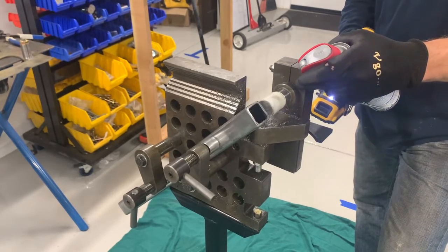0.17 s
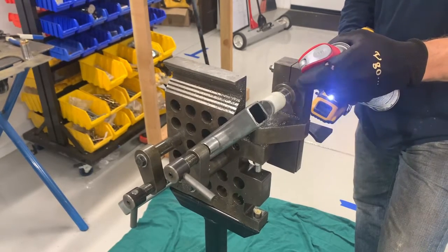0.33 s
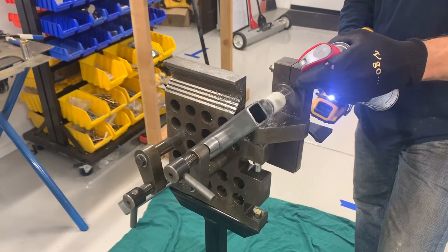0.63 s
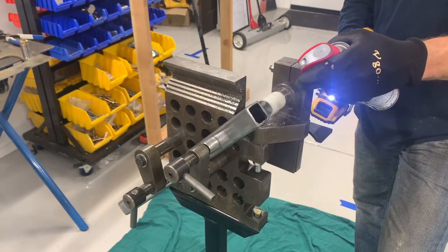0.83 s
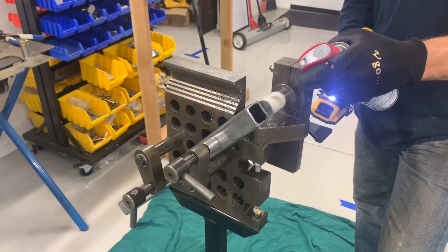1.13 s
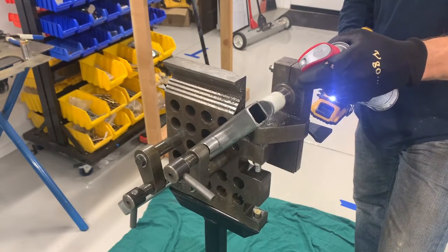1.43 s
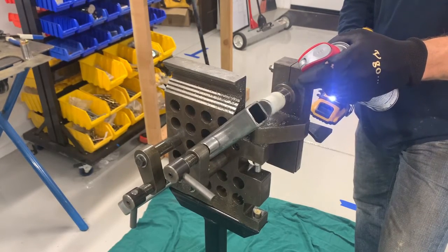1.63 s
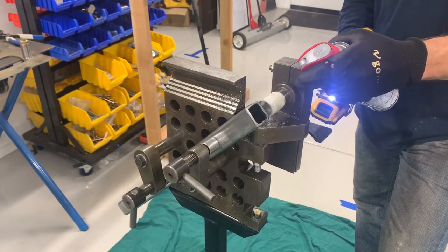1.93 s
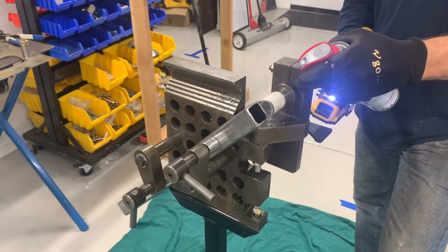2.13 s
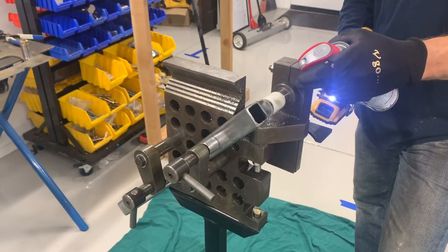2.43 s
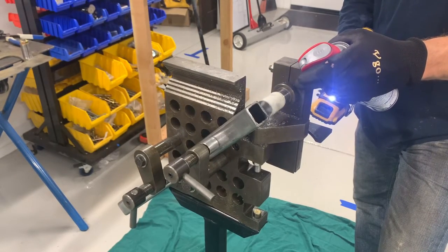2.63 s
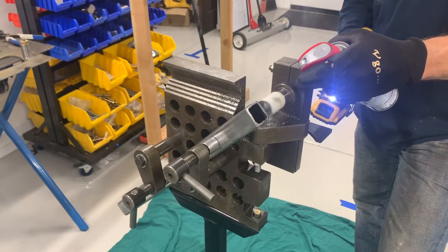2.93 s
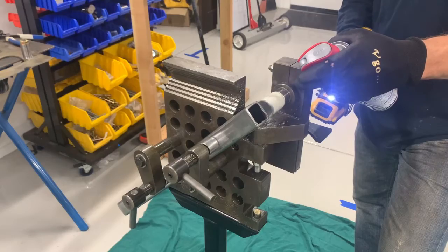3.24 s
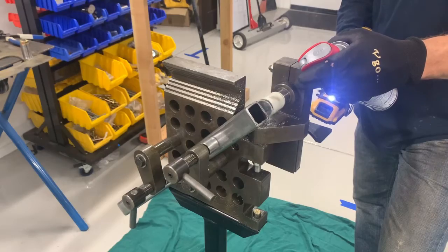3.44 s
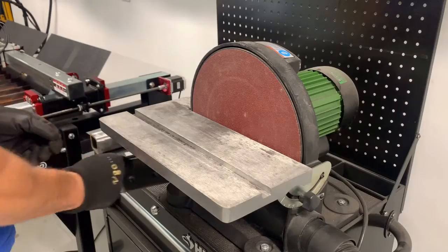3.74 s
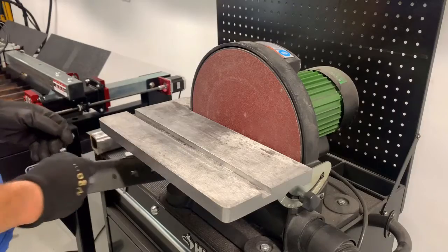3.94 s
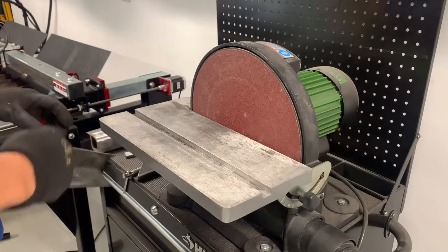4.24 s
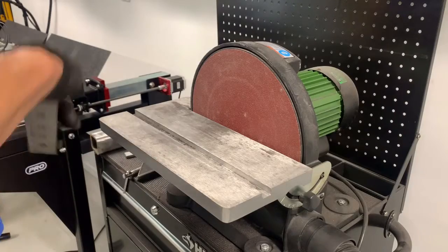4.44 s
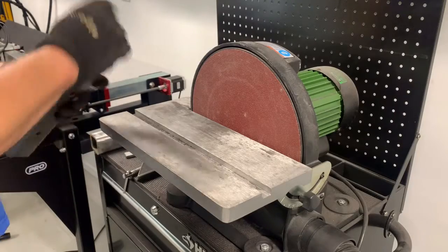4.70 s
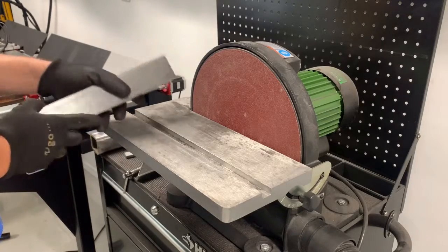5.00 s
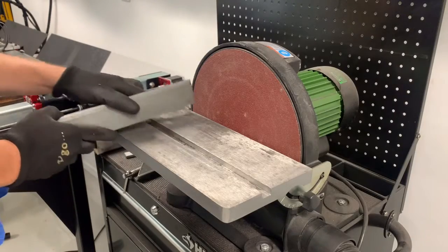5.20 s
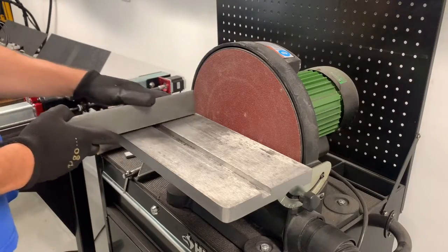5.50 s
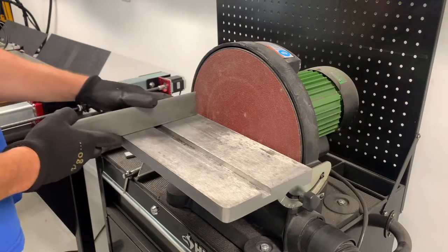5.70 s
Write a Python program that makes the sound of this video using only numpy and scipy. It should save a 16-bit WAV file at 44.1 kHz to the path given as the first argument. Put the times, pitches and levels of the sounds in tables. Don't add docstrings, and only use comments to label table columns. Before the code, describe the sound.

Pulsing metal grinding with a thin motor whine cuts abruptly to quiet rustling, then a loud clank of steel on a cast table and smaller bounces.

```python
import sys
import numpy as np
from scipy import signal
from scipy.fft import rfft, irfft, next_fast_len
from scipy.io import wavfile
from scipy.ndimage import map_coordinates

SR = 44100
rng = np.random.default_rng(int(sys.argv[2]) if len(sys.argv) > 2 else 0)


def to_wav(sig):
    pcm = np.clip(np.atleast_2d(sig), -1, 1) * 32767
    pcm = np.round(pcm).astype(np.int16)
    wavfile.write(sys.argv[1], SR, pcm.T)


def voltage_ratio(decibels):
    exponent = np.asarray(decibels, float) / 20
    return 10 ** exponent


N = 258426
SIZE = next_fast_len(N)
TIME = np.arange(N) / SR
HZ = np.maximum(np.fft.rfftfreq(SIZE, 1 / SR), 1)
SPLICE_S, BAR_DOWN_S = 3.4855, 5.263
FLAT = [(20, 0), (20000, 0)]
PORT_LAG_S, LAG_FROM_HZ = 0.000213, 4300
PORT_PHASE = -2 * np.pi * PORT_LAG_S * np.maximum(HZ - LAG_FROM_HZ, 0)

# frequency in Hz, shared power 0-1.
SAW_ALIKE = [(60, 0.1), (200, 0.95), (700, 0.38), (2500, 0.38), (4400, 0.12), (9000, 0.52), (15000, 1)]
# frequency in Hz, shared power (below 0 counts as 0).
BENCH_ALIKE = [(60, 0.92), (180, 0.96), (550, 0.39), (1650, 0.19), (4970, -0.43), (15000, -0.63)]


def rms_one(x):
    return x / np.sqrt(np.mean(x ** 2) + 1e-20)


def in_time(rows):
    s, *columns = np.transpose(rows)
    return [np.interp(TIME, s, c) for c in columns]


def at_hz(points, hz):
    where_hz, value = np.transpose(points)
    return np.interp(np.log(hz), np.log(np.maximum(where_hz, 1)), value)


def drift(rate_hz):
    r = np.exp(-80 * np.pi * rate_hz / SR)
    white = rng.standard_normal(N // 40 + 2002)
    slow = signal.lfilter([1], [1, -2 * r, r * r], white)[2000:]
    return np.interp(np.arange(N) / 40, np.arange(len(slow)), rms_one(slow))


def sound(pair):
    return irfft(pair, SIZE)[:, :N]


def stereo_noise(spectrum_db, alike, phase=0):
    shared, left, right = rfft(rng.standard_normal((3, SIZE)))
    share = np.clip(at_hz(alike, HZ), 0, 1)
    shift = np.exp(0.5j * np.outer([1, -1], phase + 0 * HZ))
    pair = np.sqrt(share) * shared * shift + np.sqrt(1 - share) * np.array([left, right])
    pair = pair * voltage_ratio(at_hz(spectrum_db, HZ))
    return pair * SIZE / np.sqrt(np.sum(np.abs(pair) ** 2))


def in_bands(pair, gain_db, count):
    low_hz, high_hz = 40, 16000
    place = np.log(HZ / low_hz) / np.log(high_hz / low_hz) * (count - 1)
    place = np.clip(place, 0, count - 1)
    out = 0
    for k, hz in enumerate(np.geomspace(low_hz, high_hz, count)):
        band = sound(pair * np.clip(1 - np.abs(place - k), 0, 1))
        out = out + voltage_ratio(gain_db(hz)) * band
    return out


def ring(push, hz, t60_s):
    r, w = voltage_ratio(-60 / (t60_s * SR)), 2 * np.pi * hz / SR
    return signal.lfilter([0, np.sin(w)], [1, -2 * r * np.cos(w), r * r], push + 1e-18)


def bites():
    # start in seconds, first swell in dB, second swell in dB.
    turns = [(0.115, 1.5, -0.3), (0.272, 3.5, 0.5), (0.418, 4, 0), (0.562, 3.5, 2.4), (0.698, 3.5, 1.5),
             (0.835, 4, 1.5), (0.963, 4, 1), (1.102, 2.5, 1.5), (1.242, 3.5, 1), (1.379, 2.5, 0),
             (1.521, 4, 3), (1.667, 4.5, 3), (1.804, 4.5, 0.5), (1.946, 6.5, 1.5), (2.083, 4.5, 1),
             (2.22, 4.5, 2.5), (2.36, 3.5, 3.5), (2.5, 4.5, 5), (2.64, 8.5, 5), (2.784, 4, 3),
             (2.917, 7.5, 4), (3.057, 7, 2.5), (3.205, 5.5, 4), (3.334, 5, -0.2), (3.473, 3.5, 1.5)]
    far_wall_lag_s = 0.08
    s, first_db, second_db = np.transpose(turns)
    return np.concatenate([s, s + far_wall_lag_s]), np.concatenate([first_db, second_db])


def swells(heights_db, length_s):
    marks = np.zeros(N)
    marks[(bites()[0] * SR).astype(int)] = heights_db
    return signal.oaconvolve(marks, np.hanning(int(length_s * SR)), "same")


def chip_hiss(low_db):
    # frequency in Hz, density in dB per Hz.
    chips = [(150, -42), (260, -20), (354, -9.5), (1010, -7.5), (1600, -1), (2180, -1), (2460, 1),
             (3350, -4.5), (4880, -2.5), (7240, -11), (9520, -7), (11500, -4.5), (13700, -17), (15700, -13)]
    high_db = swells(0.67 * bites()[1], length_s=0.1)
    teeth_hz = 115 * (1 + 0.044 * drift(3.7))
    teeth_db = 0.33 * np.sin(2 * np.pi * np.cumsum(teeth_hz) / SR) + 0.87 * drift(73)

    def chatter_db(hz):
        bright = np.clip(np.log2(hz / 2500), 0, 1)
        grip = np.clip(np.log2(hz / 150), 0, 1)
        swell_db = (1 - bright) * low_db + bright * high_db
        return grip * (swell_db + teeth_db) + 0.89 * drift(34)

    return voltage_ratio(-0.5) * in_bands(stereo_noise(chips, SAW_ALIKE, PORT_PHASE), chatter_db, count=20)


def tube_ring(low_db):
    # frequency in Hz, bandwidth in Hz, level in dB.
    tube = [(107, 5.9, -49), (160, 10, -55), (211, 6, -29), (2490, 58, -8), (4800, 29, -21.5),
            (368.2, 4.7, -18), (494.7, 7, -15.5), (644, 11, -27), (777, 7.8, -19), (1227, 13, -14),
            (1416, 13, -6), (1837, 21, -12.5), (3000, 40, -30), (3910, 45, -8.5), (1638, 25, -13.5),
            (1643, 21, -6.5), (2050, 40, -18), (2033, 12, -4), (2310, 19, -27.5), (2537, 17, -15.5),
            (2780, 40, -19.5), (3750, 50, -6), (4120, 62, -6), (4340, 33, -1), (4650, 13, -4),
            (9800, 200, -41), (9570, 390, 1)]
    white = sound(stereo_noise(FLAT, SAW_ALIKE, PORT_PHASE))
    out = np.zeros((2, N))
    for hz, width_hz, level_db in tube:
        chance = rng.standard_normal(len(bites()[0]))
        push = white * voltage_ratio(1.2 * low_db + swells(3.8 * chance, length_s=0.08))
        t60_s = np.log(1000) / (np.pi * width_hz)
        out += voltage_ratio(level_db - 15.5) * rms_one(ring(push, hz, t60_s))
    return out


def gear_whine(low_db):
    # time in seconds, frequency in Hz.
    gear_hz = [(0, 2497), (.8, 2508), (1.35, 2525), (1.7, 2500), (2, 2487), (2.8, 2475), (2.92, 2435),
               (3.2, 2420), (3.48, 2435)]
    (mesh_hz,) = in_time(gear_hz)
    mesh_hz = mesh_hz * (1 + 0.004 * drift(25) + 0.005 * drift(5))
    phase = 2 * np.pi * np.cumsum(mesh_hz) / SR
    tone = voltage_ratio(4.5 * drift(22) + 2 * drift(3)) * np.sin(phase + [[-0.2], [0.2]])
    octave = voltage_ratio(-2 - TIME + 4 * drift(20)) * np.sin(2 * phase + [[-0.5], [0.5]])
    return np.sqrt(2) * voltage_ratio(0.48 * low_db) * (tone + octave)


def drill_hum():
    # frequency in Hz, density in dB per Hz.
    hum = [(15, -47), (25, -13.5), (54, -6.5), (81, -27.5), (97, -1.5), (130, -12.5), (146, -4.5),
           (204, 14), (260, 10), (340, -32), (570, -120)]
    return voltage_ratio(-70) * sound(stereo_noise(hum, SAW_ALIKE))


def saw():
    # time in seconds, chip hiss in dB, gear whine in dB.
    cut = [(0.0, -35, -63), (0.59, -36, -52), (1.38, -37.5, -54.5), (2.25, -36, -51), (2.68, -38.5, -49.5),
           (3.32, -37, -53), (3.34, -36.5, -49.5)]
    hiss_db, whine_db = in_time(cut)
    low_db = swells(bites()[1], length_s=0.07)
    grind = voltage_ratio(hiss_db) * (chip_hiss(low_db) + tube_ring(low_db))
    whine = voltage_ratio(whine_db) * gear_whine(low_db)
    splice_db = np.interp(TIME, SPLICE_S + np.array([-0.001, 0, 0.003, 0.004]), [0, -18, -26, -90])
    return (grind + whine + drill_hum()) * voltage_ratio(splice_db)


def on_landing(before, after):
    return np.interp(TIME, [BAR_DOWN_S, BAR_DOWN_S + 0.04], [before, after])


def room_tone():
    # frequency in Hz, density in dB per Hz.
    air = [(88, -16), (150, -14), (259, -12.5), (308, -12.5), (531, -28.5), (4510, -24.5), (6920, -30),
           (9440, -19.5), (11700, -26), (13400, -25), (15700, -34)]
    return voltage_ratio(-78.5) * sound(stereo_noise(air, BENCH_ALIKE))


def stand_rumble():
    # frequency in Hz, density in dB per Hz.
    rumble = [(12, -32), (20, -8.5), (43, 0.5), (69, 2), (93, -5), (140, -23), (220, -23), (290, -45),
              (480, -120)]
    level_db = on_landing(-63, -55.5) + 2.9 * drift(9.3)
    return voltage_ratio(level_db) * sound(stereo_noise(rumble, BENCH_ALIKE))


def strokes():
    # peak time in seconds, rise in seconds, fall in seconds,
    # peak level in dB, swish centre in Hz.
    rubs = [(3.63, 0.1, 0.25, -61.5, 3600), (4.66, 0.17, .1, -61.5, 4600), (4.835, 0.13, 0.18, -67, 3450),
            (4.985, .03, 0.054, -61.5, 3000), (5.078, 0.053, 0.082, -59, 4100),
            (5.15, .06, .04, -57.5, 3800), (5.186, 0.04, 0.023, -46, 2600), (5.225, .03, .04, -57, 2500),
            (5.262, 0.014, 0.012, -43.5, 2200), (5.3, 0.053, 0.28, -50.5, 3500), (5.49, .04, .3, -54, 3200),
            (5.67, 0.0422, .12, -54.5, 3350), (5.735, 0.027, 0.14, -49, 2540)]
    edge_db = 15
    s, rise_s, fall_s, peak_db, hz = np.array(rubs).T[:, :, None]
    away = np.where(TIME < s, (s - TIME) / rise_s, (TIME - s) / fall_s)
    power = voltage_ratio(2 * np.maximum(peak_db - edge_db * away ** 1.5, -200))
    total = power.sum(axis=0)
    return 10 * np.log10(total), (power * hz).sum(axis=0) / total


def rub(slide_db, swish_hz):
    # frequency in Hz, density in dB per Hz.
    rustle = [(530, -49), (900, -25), (1200, -11), (1800, -8), (2430, -3.5), (2640, -4.5), (6950, -7),
              (9830, -6.5), (11500, -13), (13200, -13), (15700, -30)]
    tilt_db = on_landing(-0.4, -3.4)
    grain_db = 0.46 * drift(90)

    def cloth_db(hz):
        hump_db = 4.8 * np.exp(-(np.log2(hz / swish_hz) / 0.47) ** 2)
        return grain_db + tilt_db * np.log2(hz / 3500) + hump_db + 1.9 * drift(45)

    swish = in_bands(stereo_noise(rustle, BENCH_ALIKE), cloth_db, count=16)
    drag_db = on_landing(-15, 1) + 0.3 * (slide_db + 55.5) * (TIME < BAR_DOWN_S)
    drag_spectrum_db = [(150, 5.5), (300, -1.0), (1000, -1), (1600, -30.0)]
    drag = voltage_ratio(drag_db) * sound(stereo_noise(drag_spectrum_db, BENCH_ALIKE))
    return voltage_ratio(slide_db - 3.5) * (swish + drag)


def snaps():
    # start in seconds, peak level in dB, centre in Hz, decay in seconds.
    slips = [
        (4.5294, -59, 9400, 0.009),
        (4.976, -47, 2310, 0.0073),
        (5.0238, -32, 9600, 0.0007),
        (5.0724, -42.5, 4450, 0.007),
        (5.155, -38, 4390, 0.011),
        (5.174, -25, 2505, 0.01),
    ]
    out, t = np.zeros((2, N)), np.arange(4000) / SR
    for s, peak_db, hz, decay_s in slips:
        band = signal.butter(2, [hz / 2.2, hz * 2.0], "band", fs=SR)
        puff = rms_one(signal.lfilter(*band, rng.standard_normal((2, len(t)))))
        attack = np.clip(t * (hz / 85000) ** 2 * SR, 0, 1)
        at = round(s * SR)
        out[:, at:at + len(t)] += voltage_ratio(peak_db - 6) * puff * np.exp(-t / decay_s) * attack
    return out


def scrape(slide_db):
    # frequency in Hz, level in dB, t60 in seconds.
    singing = [(337, -2, 0.13), (790, 2, 0.22), (1600, -4.5, 0.079), (2432, 3, 0.082), (3940, -15, 0.15),
               (4600, -3.5, 0.13), (7682, -15.5, 0.13), (8500, -22, 0.13), (9500, -32, 0.088),
               (12750, -16, 0.042), (13700, -17.5, .04)]
    push = sound(stereo_noise(FLAT, BENCH_ALIKE))
    start = int(5.26 * SR)
    out = np.zeros((2, N))
    for hz, level_db, t60_s in singing:
        mode = rms_one(ring(push[:, start:], hz, t60_s))
        waver_db = 3 * drift(7.7)
        out[:, start:] += voltage_ratio(level_db - 10.0 + (slide_db + waver_db)[start:]) * mode
    return out


def bench():
    slide_db, swish_hz = strokes()
    moving = rub(slide_db, swish_hz) + scrape(slide_db) + snaps()
    return (room_tone() + stand_rumble() + moving) * np.clip((TIME - SPLICE_S) / 0.01, 0, 1)


def struck_modes(colour_db, t):
    # frequency in Hz, level in dB, t60 in seconds.
    bar = [(88.7, -12, 0.96), (273, 4.5, 0.4), (340, 9, 0.085), (545, -2, 0.285), (790, 5, 0.18),
           (1230, 1.5, 0.18), (1310, -14, 0.29), (1470, 1, 0.35), (1655, -1, 0.26), (1770, -17, 0.74),
           (1900, 0, 0.17), (2510, -1.5, 0.25), (2310, -4, 0.14), (2790, -20, 0.44), (3360, -23, 0.77),
           (3888, -3, 0.38), (3930, -5, 0.36), (4660, -25, 0.16), (4974, -21.5, 0.99), (5220, -19, 0.42),
           (5300, -28, 0.38), (6200, -15.5, 0.38), (7970, -6.5, .15), (8400, -7.5, 0.12), (8900, -34, 0.39),
           (9200, -11, 0.12), (9790, -12.5, 0.38), (12750, -15, 0.23), (13740, -19, .25), (14300, -38, .3)]
    hz, level_db, t60_s = np.array(bar).T[:, :, None]
    share = np.clip(at_hz(BENCH_ALIKE, hz), 0, 1)
    twin = np.clip(hz / 2500, 0, 0.8)
    level_luck, split_luck, phase_luck, side_luck, twin_luck = rng.standard_normal((5, len(bar), 1))
    start_db = level_db + at_hz(colour_db, hz) - 23.0 + 2.0 * level_luck
    rise_s = 0.0008 + 3 / hz
    fade = voltage_ratio(start_db - 60 * t / t60_s) * (1 - np.exp(-t / rise_s))
    rocking = rng.standard_normal((len(bar), 30))
    where = np.broadcast_arrays(np.arange(len(bar))[:, None], t * 55)
    fade = fade * voltage_ratio(5 * twin * map_coordinates(rocking, where, order=1))
    twin_hz = hz + 0.012 * hz * np.tanh(split_luck)
    sides = []
    for side in (1, -1):
        phase = phase_luck * 9 + side * (1 - share) * np.tanh(side_luck)
        first = np.sin(2 * np.pi * hz * t + phase)
        second = twin * np.sin(2 * np.pi * twin_hz * t + phase + 9 * twin_luck)
        sides.append(np.sum(fade * (first + second), axis=0))
    return np.array(sides)


def knocks():
    # start in seconds, peak in dB, thud in dB, ping in dB, left over right in dB.
    touches = [
        (5.263, -9.5, -11.5, -7, -1),
        (5.27, -20.5, -4.5, -19, 0),
        (5.458, -29, 0.5, 5.5, -2.5),
        (5.466, -28, 6.5, 9.5, -1),
        (5.636, -44, 15.5, 3, 1.5),
        (5.648, -39, 6.5, 14.5, 0),
        (5.726, -37, -13.5, 10.5, 0.5),
    ]
    # frequency in Hz, density in dB per Hz.
    crack_spectrum = [(88, -18.5), (150, -19.5), (340, 4.5), (541, -19), (768, -1.5), (989, -14),
                      (1230, -2.5), (2110, -10), (2420, -7.5), (3440, -14.5), (3940, -7.5), (6530, -29),
                      (10000, -26), (15700, -48.5)]
    out, t = np.zeros((2, N)), np.arange(int(0.5 * SR)) / SR
    noise = stereo_noise(crack_spectrum, BENCH_ALIKE)
    splash = voltage_ratio(-3.5) * np.exp(-t / 0.0097)
    chatter = voltage_ratio(-30) * np.exp(-t / 0.063)
    envelope = (splash + chatter) * np.clip(t / 0.0015, 0, 1)
    for k, (s, peak_db, thud_db, ping_db, pan_db) in enumerate(touches):
        colour_db = [(100, 0), (200, thud_db), (400, thud_db), (1200, thud_db / 2),
                     (2500, 0), (5000, 0), (7000, ping_db)]
        body = struck_modes(colour_db, t)
        crack = sound(noise * voltage_ratio(at_hz(colour_db, HZ)))[:, k * 9000:][:, :len(t)]
        gain = voltage_ratio(peak_db + np.array([[0.5], [-0.5]]) * pan_db)
        at = round(s * SR)
        out[:, at:at + len(t)] += (gain * (body + crack * envelope))[:, :N - at]
    return out


def shop(x):
    # frequency in Hz, t60 in seconds.
    shop_t60_s = [(200, 0.7), (1000, 0.67), (4000, 0.62), (10000, 0.79)]
    late = np.clip((TIME - 0.006) / 0.025, 0, 1) * (TIME < 1)
    white = stereo_noise(FLAT, BENCH_ALIKE)
    tail = late * in_bands(white, lambda hz: -60 * TIME / at_hz(shop_t60_s, hz), count=8)
    tail = tail[:, :SR] / np.sqrt(np.sum(tail ** 2) / 2)
    return signal.fftconvolve(x.mean(axis=0)[None], tail, axes=1)[:, :N]


def scene():
    hits = knocks()
    return saw() + bench() + hits + voltage_ratio(-7.5) * shop(hits)


def low_pass(x):
    return signal.sosfilt(signal.butter(12, 15810, fs=SR, output="sos"), x)


def record(dry):
    notch_hz, notch_width_hz, notch_share = 11500, 1120, 0.86
    ceiling, top_hz = 0.76, 15790
    notched = signal.lfilter(*signal.iirnotch(notch_hz, notch_hz / notch_width_hz, fs=SR), dry)
    heard = dry + notch_share * (notched - dry)
    heard = rfft(ceiling * np.tanh(heard / ceiling), SIZE)
    return low_pass(sound(heard * (HZ < top_hz)))


dry = scene()
out = record(dry)
to_wav(out)
```